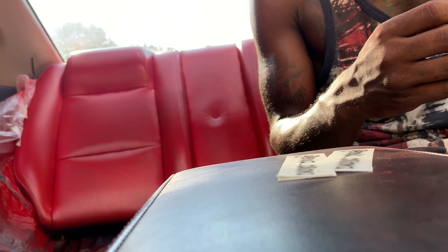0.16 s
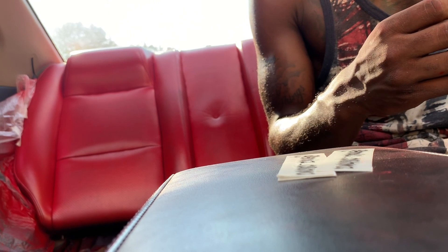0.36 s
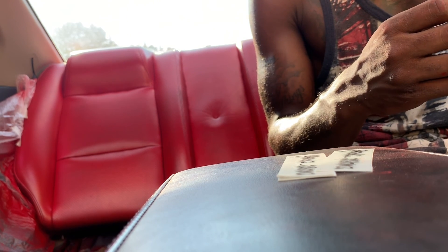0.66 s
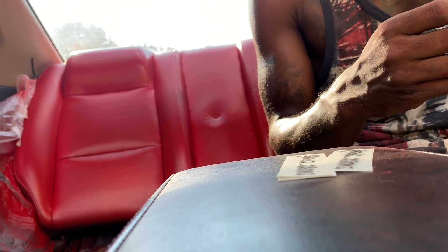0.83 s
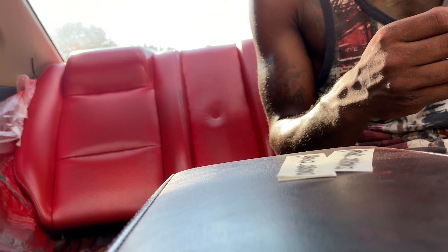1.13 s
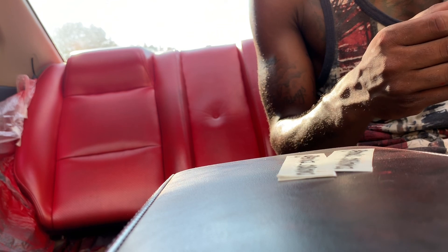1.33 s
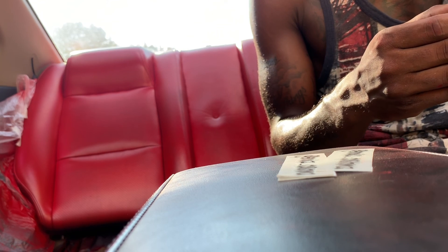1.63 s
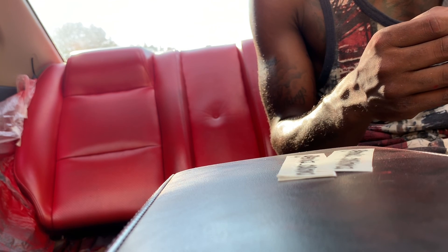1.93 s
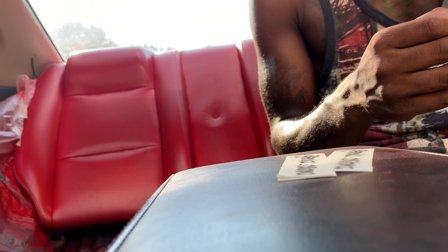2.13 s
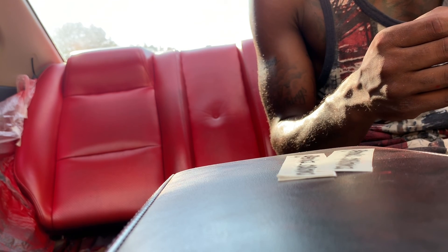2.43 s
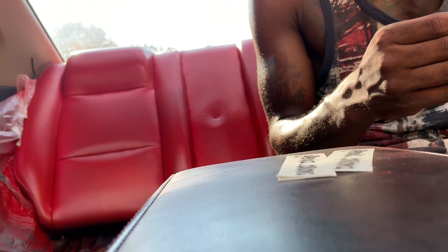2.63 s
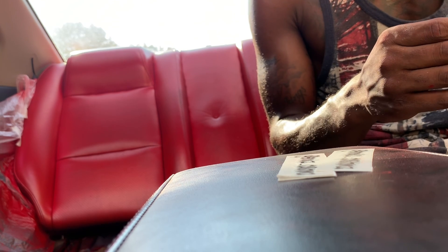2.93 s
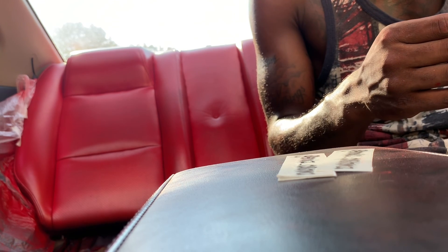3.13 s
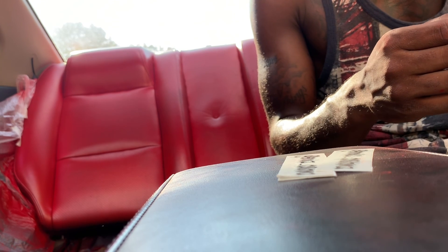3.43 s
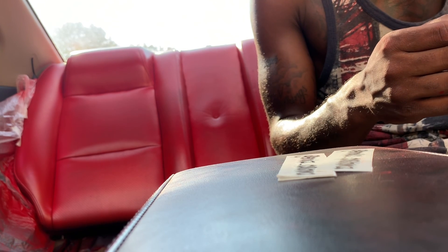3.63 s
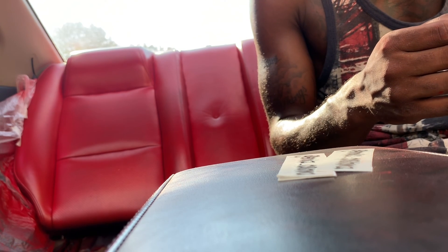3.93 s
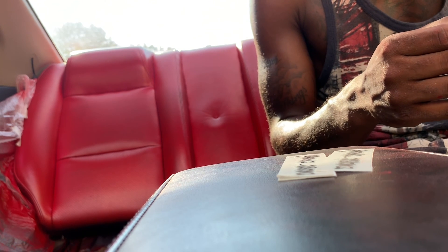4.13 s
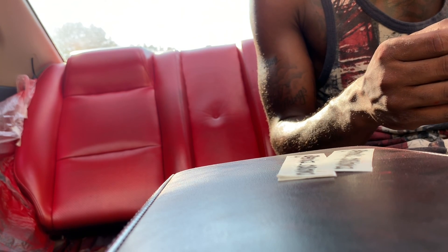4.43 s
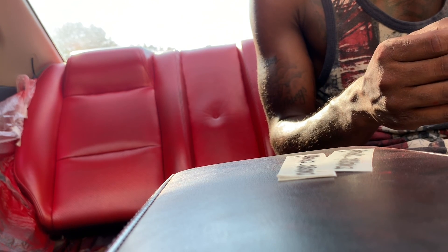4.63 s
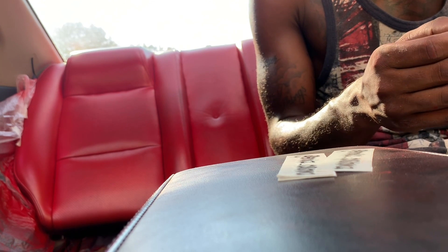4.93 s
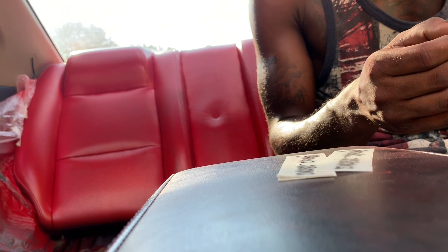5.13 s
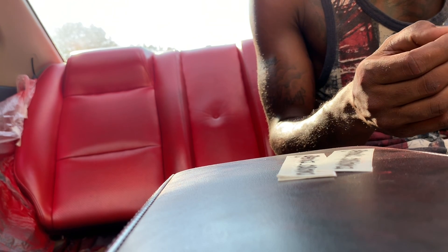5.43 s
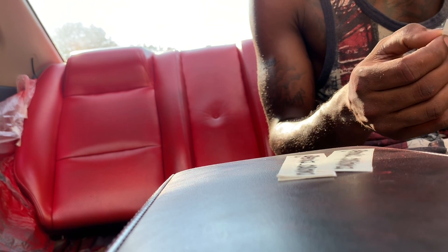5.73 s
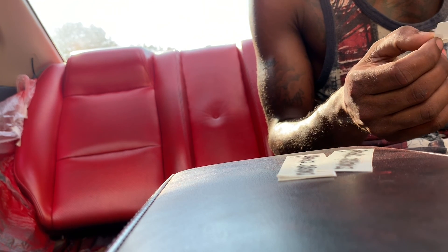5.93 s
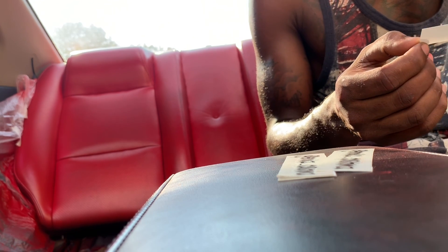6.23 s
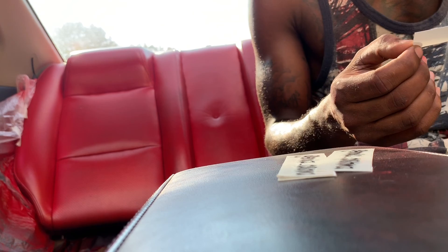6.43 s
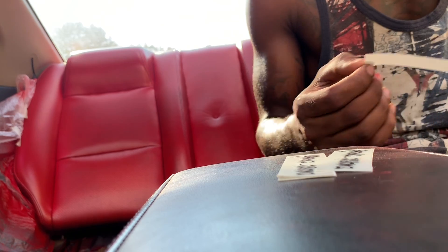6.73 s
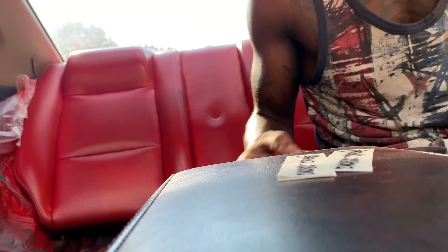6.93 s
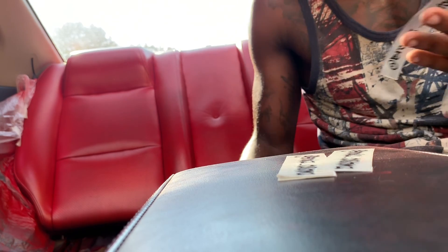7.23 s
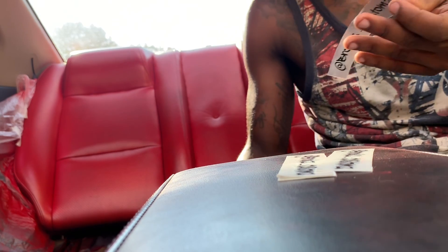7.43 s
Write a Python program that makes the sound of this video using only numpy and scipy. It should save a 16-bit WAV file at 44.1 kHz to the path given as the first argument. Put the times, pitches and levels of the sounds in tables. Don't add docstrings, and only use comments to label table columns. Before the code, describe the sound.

Close to a phone on a parked car's console, a fingernail makes sparse dry ticks on a plastic decal. Outside, a low engine hum surges, lurches into gear and climbs away. From about four seconds the film peels with sticky crackle and sharp bright snaps, then a soft strip of hiss brushes cloth. The cabin adds a very short tail.

```python
import sys
import numpy as np
from scipy import signal
from scipy.fft import rfft, irfft
from scipy.io import wavfile
from scipy.ndimage import uniform_filter1d

SR = 44100
rng = np.random.default_rng(int(sys.argv[2]) if len(sys.argv) > 2 else 0)


def field_ratio(decibels):
    return 10 ** (np.asarray(decibels, dtype=float) / 20)


def bounce(signal):
    frames = np.transpose(np.atleast_2d(signal))
    limited = np.clip(frames, -1, 1)
    pcm = np.round(limited * 32767).astype(np.int16)
    wavfile.write(sys.argv[1], SR, pcm)


N = 333837
TIME = np.arange(N) / SR
FREQ = np.fft.rfftfreq(N, 1 / SR)
PORT_LAG_SAMPLES = 11.4
HISS_TOP_HZ = 15800

# (time [s], peak [dB], ring [Hz], body [dB re peak], edge [dB re peak])
FILM_SNAPS = [(4.2972, -41, 6740, -1, 3), (4.314, -50.5, 7190, -8.5, 0), (4.3237, -44, 6800, -18, -4),
              (4.5302, -43.5, 6300, -8.5, -26), (4.6136, -47.5, 7500, -9, -7),
              (4.6569, -38, 7860, -10.5, -1.5), (4.6856, -38.5, 6800, -28, -0.5),
              (4.7777, -36, 5960, -15, -13), (4.8166, -40, 6000, -20, -5), (4.9082, -43, 6560, -6.5, -2),
              (5.013, -40.5, 7140, -29, -22), (5.094, -38.5, 7100, -22, -14),
              (5.1297, -41.5, 7100, -10, -17), (5.1779, -45, 8450, -6, 5), (5.254, -44.5, 8000, -35, 4.5),
              (5.2988, -41.5, 6300, -17, 1.5), (5.341, -22.5, 8070, -20, -18),
              (5.4254, -31, 7230, -10, 3.5), (5.5346, -32, 10320, -17, -16), (5.5486, -33.5, 9400, -30, -8),
              (5.7412, -37.5, 6200, -19, -10.5), (5.8916, -43.5, 6500, -16, -10),
              (6.0316, -30, 6500, -15, -18.5), (6.158, -36.5, 7500, -33, -7.5)]
# (time [s], peak [dB], ring [Hz], body [dB re peak], edge [dB re peak])
NAIL_PICKS = [(0.2905, -47, 4550, -9, -28), (0.8308, -60, 8000, 4.5, -4), (0.838, -68, 7935, -3, 0),
              (0.907, -47.5, 6460, 2.5, -12), (0.9125, -42.5, 7410, 0, -13), (0.9315, -34.5, 6230, -7, -10),
              (0.9443, -44.5, 7430, -1, -0.5), (0.946, -39.5, 6400, -1.5, -7), (0.955, -41, 5940, -8, -7),
              (0.993, -35.5, 8560, -8.5, -4.5), (1.969, -51, 5660, -21, -13), (2.4787, -54, 8000, -11, -3),
              (3.0141, -51, 6300, -26, -8), (3.096, -56.5, 7950, -24, -10), (3.4031, -47, 7470, -5.5, -5),
              (3.5402, -41.5, 7556, -15.5, -7), (3.617, -53, 9500, -27, -17),
              (3.6445, -38.5, 8700, -35, -18.5), (4.0226, -47.5, 8000, -22, -7),
              (4.2266, -46.5, 7710, -24, -15), (6.4921, -25.5, 7600, -12.5, -17),
              (6.558, -50, 8600, -5, -5), (6.5684, -44.5, 7740, 2, -1), (6.6056, -49.5, 5150, 4, -12)]
# (time [s], peak [dB], ring [Hz])
SMALL_TICKS = [(4.3438, -37, 7640), (4.3546, -49, 8200), (4.3755, -52.5, 8200), (4.4572, -51, 6500),
               (4.4856, -43, 9400), (4.6242, -42.5, 6560), (4.6679, -45, 7000), (4.7232, -50, 7100),
               (4.7459, -43, 7560), (4.7563, -45, 6340), (4.7833, -44, 8450), (4.9299, -46, 8300),
               (4.9708, -40.5, 7240), (4.999, -43, 6200), (5.054, -49, 6850), (5.0799, -48.5, 6750),
               (5.1859, -42, 6300), (5.3122, -39, 8400), (5.5045, -43.5, 9800), (5.578, -42, 8000),
               (5.6332, -41, 6550), (5.708, -43, 6630), (5.8534, -43.5, 6600), (5.953, -50.5, 5800),
               (5.9779, -46, 6650), (6.1016, -52.5, 6670), (6.1468, -40.5, 7500), (6.2208, -56, 6204),
               (6.3069, -55, 5770), (6.3816, -48.5, 6100)]
# (time [s], peak [dB], ring [Hz])
NAIL_PROBES = [(2.245, -63, 8500), (2.36, -64.5, 7550), (2.4608, -59, 8300), (2.508, -57.5, 8100),
               (3.8369, -61.5, 7400), (3.898, -60, 7800), (3.9553, -59, 8400), (3.9677, -56, 8300),
               (3.974, -57, 8330), (3.994, -56, 8450), (4.04, -59, 7950), (4.213, -53, 7500),
               (4.238, -56, 7500), (4.247, -54, 7000)]
# (time [s], level [dB])
GLUE_PULLS = [
    [(0.89, -77), (1.03, -79)],
    [(4.1, -87), (4.28, -79), (4.39, -63), (4.57, -73.5), (5.05, -68.5), (5.25, -79.5), (5.65, -71.5),
     (6.0, -73.5), (6.7, -86)],
]
# (rub [dB re pull], bright edge [dB re pull])
SKIN_GRIP = [(6, -13), (-11, -8)]
# (time [s], half length [s], level [dB])
STRIP_SLIDE = [
    (7.077, 0.15, -75.5),
    (7.206, 0.027, -72.5),
]
# (frequency [Hz], gain [dB])
CUPPED_HANDS = [(1000, 6.5), (2500, -3.5), (4100, -1.5), (4800, 2.5), (5800, -0.5), (6500, 1), (7700, -5.5),
                (9300, 2.5), (10800, -3), (13200, -1), (16000, -3.5)]
# (frequency [Hz], lag [rad])
NEAR_LAG_RAD = [(500, 0.63), (2500, 2.79), (4200, 2.04), (5100, 3.1), (6100, 5.3), (7500, 6.9)]
# (frequency [Hz], gain [dB])
HAND_SHADOW = [(1000, 3), (2600, 2.5), (4000, -5.5), (5600, -8.5), (7200, -3.5)]
# (time [s], firing rate [Hz], load [dB])
ENGINE_PULL = [(0.0, 61.27, -56.5), (1.75, 68, -51.5), (2.1, 60.18, -50.5), (2.3, 58.04, -37),
               (2.75, 60.28, -43), (3.25, 61.12, -43.5), (3.4, 63.43, -46), (3.61, 74.7, -34),
               (3.9, 83.05, -44), (4.3, 84, -39), (4.8, 86.84, -45.5), (4.93, 87.33, -55.5),
               (5.1, 88.73, -49), (5.55, 93.35, -45), (5.8, 96.4, -63.5), (6.1, 101.4, -54.5),
               (6.6, 102.7, -54), (7.0, 106, -60)]
# (time [s], width [s], panel roar [dB], low drone [dB])
TRAFFIC_SWELLS = [(0.0, .06, -95, -57.5), (.3, 0.088, -98, -66.5), (2.05, .2, -76, -63),
                  (2.25, 0.1, -59.5, -65), (2.6, 0.38, -69.5, -73.5), (3.6, 0.26, -67, -71.5),
                  (4.05, 0.18, -80.5, -63.5), (5.1, 0.13, -75.5, -69), (6.15, 0.39, -69, -59),
                  (6.55, 0.14, -69, -67.5), (7.45, 0.38, -66, -59)]
# (frequency [Hz], width [Hz], level [dB])
PANEL_MODES = [(353.4, 84, 0.45), (467.3, 63, 1.5), (576, 67, -0.5), (880, 170, -8.5)]
# (frequency [Hz], density [dB per Hz])
QUIET_FLOOR = [(12, -39), (20, -19.5), (65, 0), (79, -9.5), (107, -22), (134, -17), (182, -30.5),
               (222, -46), (310, -49), (459, -30.5), (527, -39.5), (1150, -34.5), (2460, -51.5),
               (16000, -63)]
# (frequency [Hz], likeness [0-1])
LIKENESS = [(30, 0.94), (70, 0.8), (150, 0.37), (350, 1), (700, 0.12), (1500, 0.39), (3000, 0),
            (6000, 0.18)]
# (frequency [Hz], left minus right [dB])
FAR_LEAN = [(40, -2.5), (120, -2), (300, 1), (600, 3.0), (1500, 0.5), (3500, -0.5), (5500, -1.5),
            (7500, -4.5)]


def unit(x):
    return x / np.sqrt(np.mean(x ** 2))


def along(table, quiet=None):
    s, *columns = np.transpose(table)
    return [np.interp(TIME, s, c, quiet, quiet) for c in columns]


def over(table):
    hz, value = np.transpose(table)
    return np.interp(np.log(FREQ + 1), np.log(hz), value)


def colour(x, gain):
    return irfft(rfft(x) * gain, N)


def band(x, lo_hz, hi_hz, order=2):
    return signal.sosfilt(signal.butter(order, [lo_hz, hi_hz], "band", fs=SR, output="sos"), x)


def walk(rate_hz):
    k = int(SR / rate_hz)
    steps = np.repeat(rng.standard_normal(N // k + 1), k)
    return uniform_filter1d(uniform_filter1d(steps, k), k)[:N]


def decay(x, tau_s):
    return signal.lfilter([1], [1, -np.exp(-1 / (tau_s * SR))], x)


def swing(t, rise_s):
    return (t / rise_s) ** 2 * np.exp(2 - 2 * t / rise_s)


def snaps():
    small = SMALL_TICKS + flecks() + NAIL_PROBES
    events = [(*row, 0.0003) for row in NAIL_PICKS + FILM_SNAPS]
    events += [(s, db, hz, -24.0, -30.0 + hz / 600, 0.00031) for s, db, hz in small]
    length = 256
    t = np.arange(length) / SR
    out, shake = np.zeros(N), np.zeros((3, N))
    for s, db, hz, body_db, edge_db, ring_s in events:
        kick = rng.standard_normal((3, length))
        rough = unit(band(kick[0], 0.81 * hz, 1.28 * hz))
        ring = swing(t, ring_s) * (np.sin(2 * np.pi * hz * t) + 0.63 * rough)
        body = swing(t, 0.00045) * unit(band(kick[1], 1940, 6260))
        edge = swing(t, 0.0003) * unit(band(kick[2], 9200, 16000))
        i = int((s - 0.0004) * SR)
        out[i:i + length] += field_ratio(db + 1.0) * (ring + field_ratio(body_db) * body + field_ratio(edge_db) * edge)
        shake[:, i] = field_ratio(db + np.array([0, body_db, edge_db]))
    lead_in = decay(np.minimum(shake, field_ratio(-47.0))[:, ::-1], 0.0037)[:, ::-1]
    quiver = decay(shake, 0.0092) + 3.1 * lead_in
    grit = glue(1300, 3.0)
    bands_hz = ((4800, 10000), (1700, 5000), (9500, 15800))
    crackle = [unit(band(grit, lo, hi)) for lo, hi in bands_hz]
    return out + np.sum(field_ratio(np.array([[-22.0], [-18.0], [-16.0]])) * quiver * crackle, axis=0)


def flecks():
    rows = [row[:3] for row in FILM_SNAPS + SMALL_TICKS]
    s, db, hz = np.repeat(rows, 2, axis=0).T
    wait_s = 0.0018 + 0.033 * rng.exponential(size=len(s))
    luck = rng.standard_normal((len(s), 2))
    db = np.minimum(db, -40) - 15.5 + 7 * luck[:, 0]
    hz = np.clip(hz + 670 * luck[:, 1], 5000, 10000)
    return list(zip(s + wait_s, db, hz))


def peel():
    out = 0
    for pull, (rub_db, bright_db) in zip(GLUE_PULLS, SKIN_GRIP):
        pull_db, = along(pull, -150)
        body_db = pull_db + rub_db + 3.0 * walk(5.4)
        edge_db = pull_db + bright_db + 4.6 * walk(14)
        coarse, fine = (glue(600, 3.5) + 0.25 * rng.standard_normal(N) for _ in range(2))
        low = field_ratio(3.0 * walk(12)) * band(coarse, 5000, 7000, order=3)
        high = field_ratio(3.0 * walk(12)) * band(fine, 7700, 10200)
        out = out + field_ratio(pull_db - 2.5) * unit(low + 0.9 * high)
        out = out + field_ratio(body_db + 1.5) * unit(band(coarse, 1300, 4300))
        out = out + field_ratio(edge_db + 1.5) * unit(band(fine + 0.5 * coarse, 10000, 15800, order=3))
    return out


def glue(per_s, spread_db):
    breaks = rng.random(N) < per_s / SR * field_ratio(4.0 * walk(50))
    boost = field_ratio(spread_db * np.minimum(rng.exponential(size=N), 3))
    return unit(breaks * np.tanh(rng.standard_normal(N)) * boost)


def slide():
    whisper_gain, rub_gain = (field_ratio(db) * np.exp(-((TIME - s) / half_s) ** 2)
                              for s, half_s, db in STRIP_SLIDE)
    noise = rng.standard_normal((2, N))
    whisper = unit(band(noise[0], 10800, 12400) + 0.69 * band(noise[0], 9000, 15700, order=3))
    rub = unit(band(noise[1], 3600, 7100))
    return whisper_gain * whisper + rub_gain * rub


def cabin(x):
    t60_s, tail_db, length = 0.07, -10.0, 8192
    x = colour(x, field_ratio(over(CUPPED_HANDS)))
    t = np.arange(length) / SR
    onset = np.clip(t / 0.0015 - 1, 0, 1)
    tail = rng.standard_normal((2, length)) * 1000 ** (-t / t60_s) * onset
    tail = tail / np.sqrt(np.sum(tail[0] ** 2))
    wet = signal.fftconvolve(x[None], tail, axes=1)[:, :N]
    left = colour(x, np.exp(-1j * over(NEAR_LAG_RAD))) + field_ratio(tail_db + 5.0) * wet[0]
    right = x + field_ratio(tail_db) * wet[1]
    return np.array([colour(left, field_ratio(over(HAND_SHADOW))), right])


def engine():
    boom_hz, boom_width_hz, boom_db, lift_s, lift_db_per_s = 198.1, 19.6, -61, 6.55, 35
    hz, firing_db = along(ENGINE_PULL)
    half_db = -63 + 0.2426 * (hz - 60) + 2.5 * walk(5)
    turn = 2 * np.pi * np.cumsum(hz * (1 + 0.0071 * walk(12))) / SR
    boom = field_ratio(boom_db - lift_db_per_s * np.maximum(TIME - lift_s, 0))
    boom = boom / (1 + ((2 * hz - boom_hz) / boom_width_hz) ** 4)
    orders = [(1, field_ratio(firing_db)), (0.5, field_ratio(half_db)), (1.5, field_ratio(firing_db - 27.5)), (2, boom)]
    tone = sum(gain * field_ratio(1.2 * walk(14)) * np.sin(k * turn) for k, gain in orders)
    return np.sqrt(2) * tone * np.clip((7.2 - TIME) / 0.46, 0, 1)


def thud():
    start_s, length_s, hz, db = 2.08, 0.067, 40.6, -40.5
    turn = 2 * np.pi * hz * (TIME - start_s)
    swell = np.exp(-((TIME - start_s) / length_s) ** 2)
    return field_ratio(db) * swell * (np.sin(turn) + 0.57 * np.sin(2 * turn))


def road():
    roar_db, drone_db, rumble_db, rumble_share = -74, -71.5, -57.0, 0.31
    s, width_s, roar_peak_db, drone_peak_db = np.transpose(TRAFFIC_SWELLS)
    shape = np.exp(-((TIME[:, None] - s) / width_s) ** 2)
    roar_gain = field_ratio(roar_db) + shape @ field_ratio(roar_peak_db)
    drone_gain = field_ratio(drone_db) + shape @ field_ratio(drone_peak_db)
    rumble_gain = field_ratio(rumble_db) * (drone_gain / field_ratio(drone_db)) ** rumble_share
    rumble = unit(band(diffuse(), 34, 69.2)) * rumble_gain
    drone = unit(band(diffuse(), 100.4, 210.6, order=3)) * drone_gain * field_ratio(2.8 * walk(8.7))
    noise = diffuse()
    roar = sum(field_ratio(db + 2.95 * walk(7)) * band(noise, hz - width_hz / 2, hz + width_hz / 2)
               for hz, width_hz, db in PANEL_MODES)
    tread_db = -83.5 + 1.66 * TIME - 7.0 + 4.1 * walk(5.3)
    tread = unit(band(noise, 900, 2420)) * field_ratio(tread_db)
    return rumble + drone + unit(roar) * roar_gain + tread


def still():
    floor = field_ratio(-50.5 - 3.0) * unit(colour(diffuse(), field_ratio(over(QUIET_FLOOR))))
    out = colour(floor, FREQ < HISS_TOP_HZ)
    for hz in 45 * 2 ** np.arange(6):
        octave = abs(np.log2((FREQ + 1) / hz)) < 0.5
        out = out + colour(floor, octave) * (field_ratio(1.2 * walk(5.4)) - 1)
    return out


def port_lag():
    return np.exp(-2j * np.pi * FREQ * PORT_LAG_SAMPLES / SR)


def diffuse():
    right, other = rfft(rng.standard_normal((2, N)))
    alike = np.clip(over(LIKENESS), 0, 1)
    left = alike * right * port_lag() + np.sqrt(1 - alike ** 2) * other
    return irfft(np.array([left, right]), N)


def scene():
    near = cabin(snaps() + peel() + slide())
    far = engine() + thud() + road() + still()
    lean = field_ratio(over(FAR_LEAN) / 2)
    return near + colour(far, np.array([lean, 1 / lean]))


def top_cut(x):
    return signal.sosfilt(signal.butter(12, 17030, fs=SR, output="sos"), x)


def record(dry):
    shared_hz, top_hz = 7000, 16300
    shared = 1 / (1 + (shared_hz / (FREQ + 1)) ** 20)
    left, right = rfft(dry) / (1 + (FREQ / top_hz) ** 60)
    left = (1 - shared) * left + shared * right * port_lag()
    both = irfft(np.array([left, right]), N)
    top = colour(both, FREQ > HISS_TOP_HZ)
    shut = uniform_filter1d(top[1] ** 2, size=256) < field_ratio(-73) ** 2
    mix = both - top * uniform_filter1d(1.0 * shut, size=128)
    return top_cut(mix)


dry = scene()
out = record(dry)
bounce(out)
```